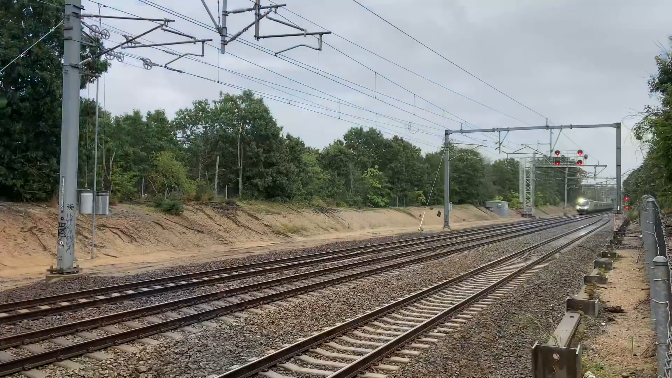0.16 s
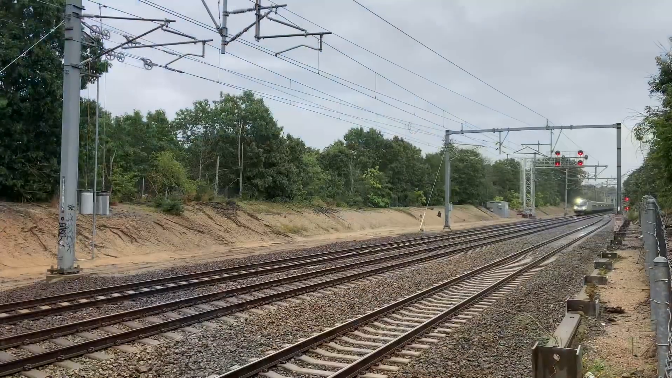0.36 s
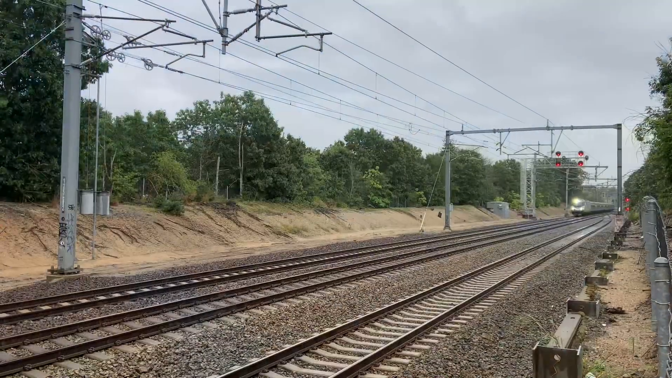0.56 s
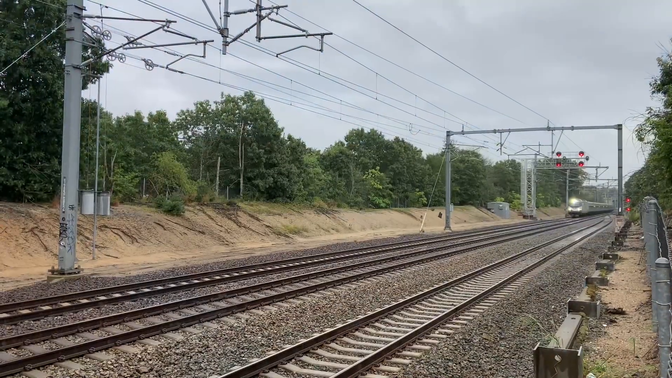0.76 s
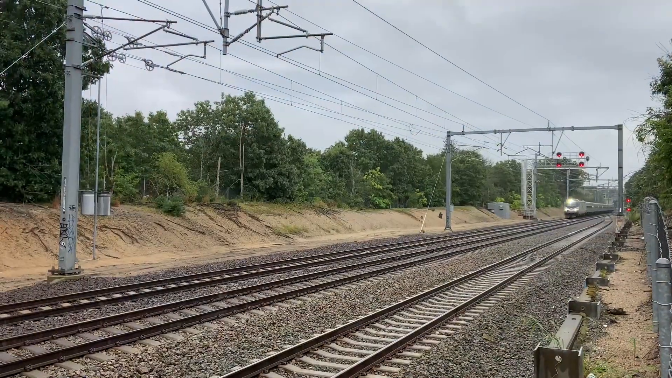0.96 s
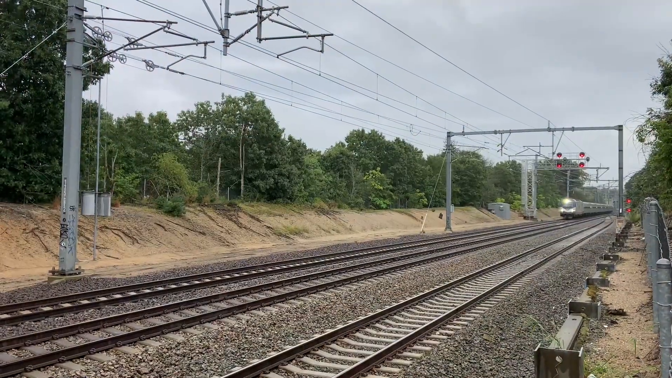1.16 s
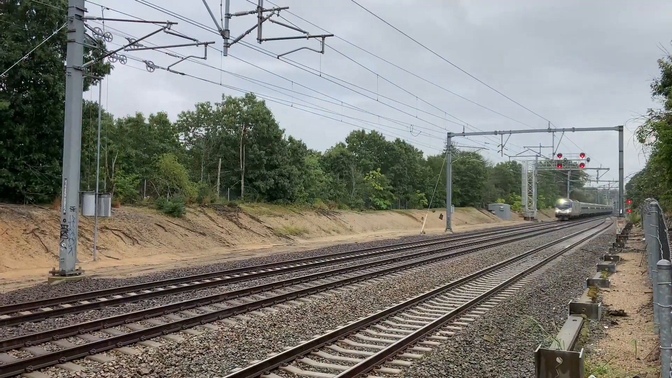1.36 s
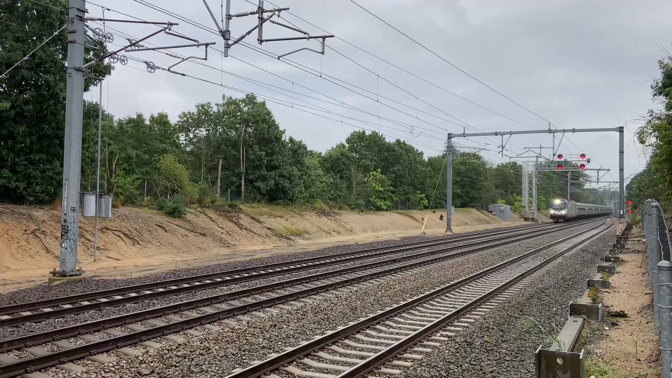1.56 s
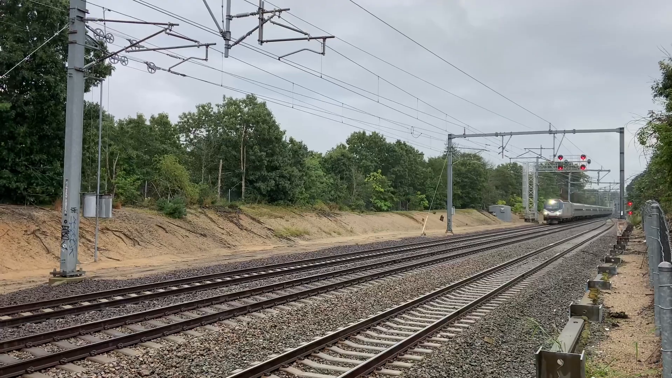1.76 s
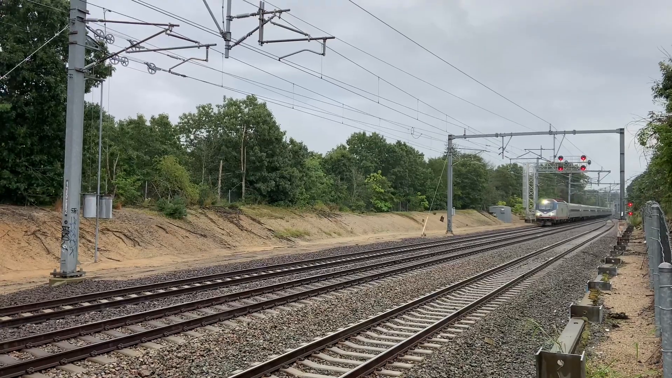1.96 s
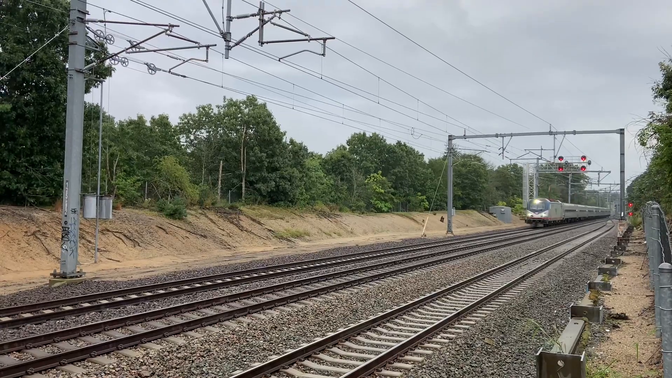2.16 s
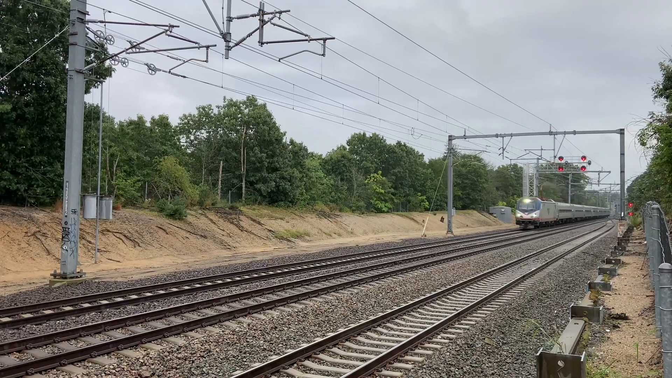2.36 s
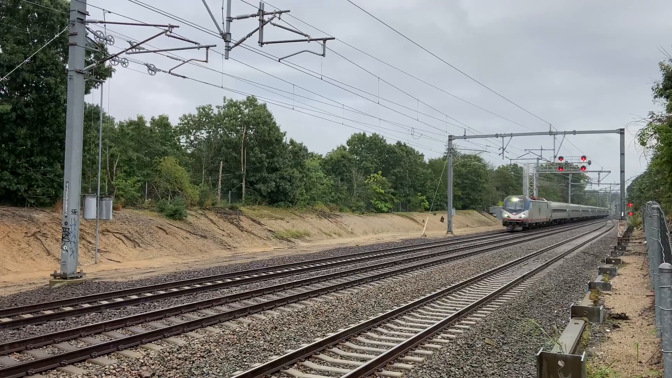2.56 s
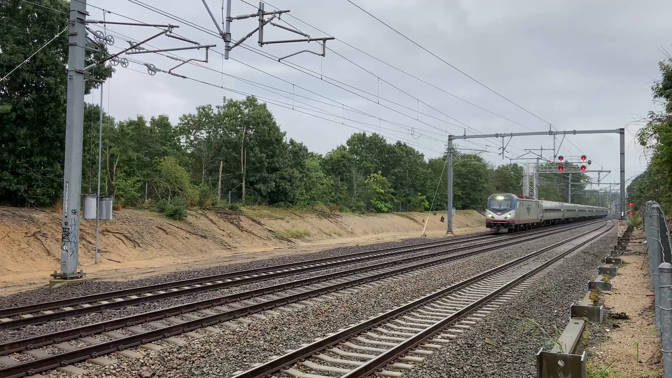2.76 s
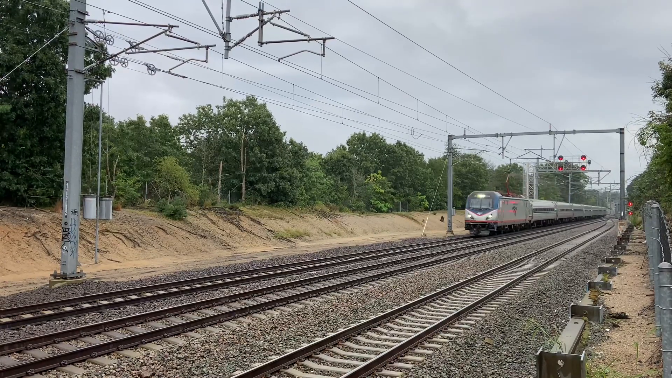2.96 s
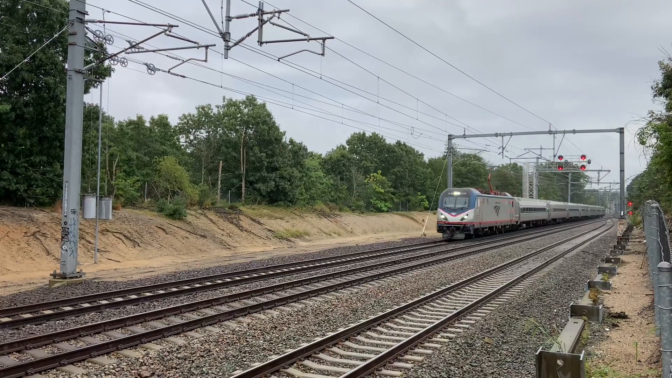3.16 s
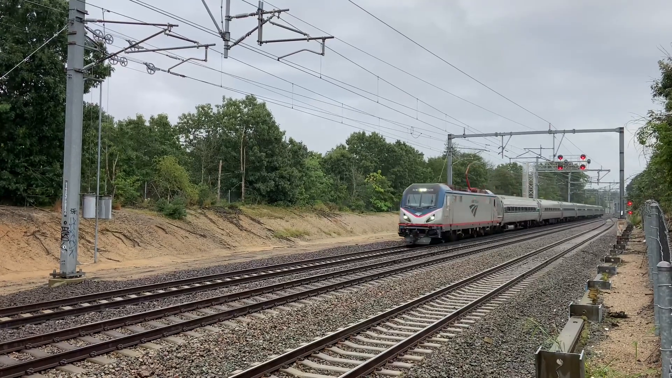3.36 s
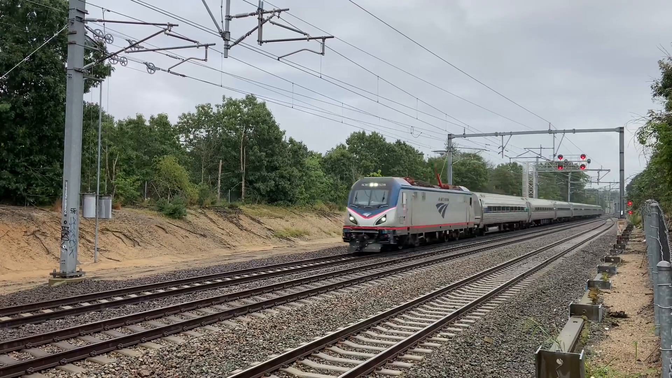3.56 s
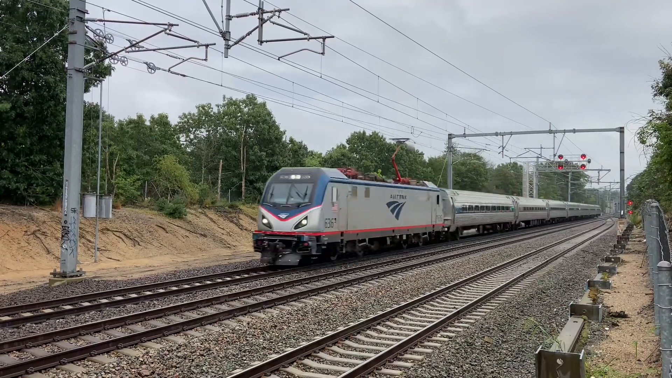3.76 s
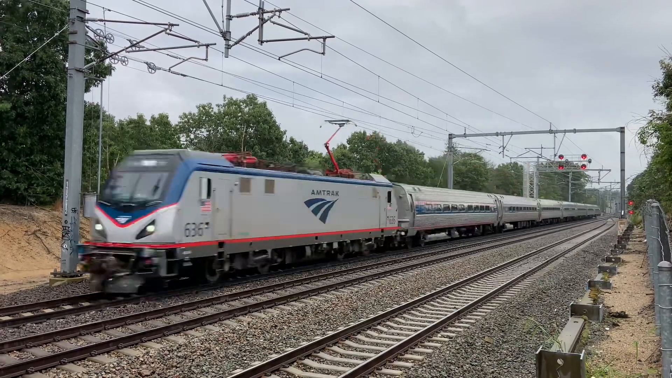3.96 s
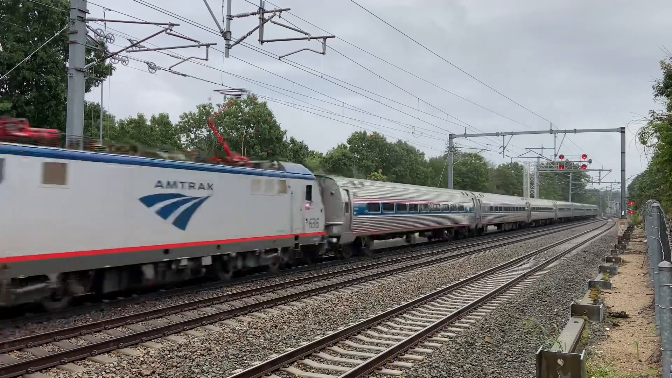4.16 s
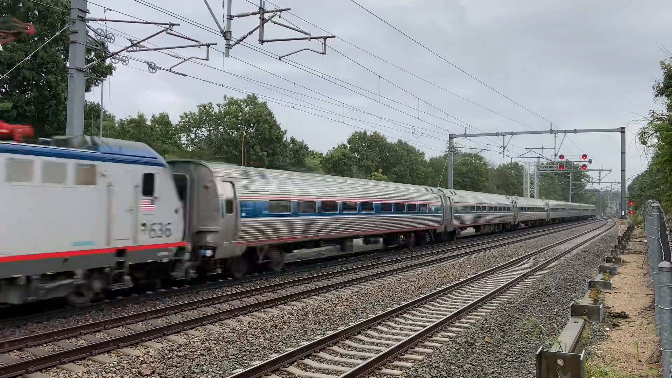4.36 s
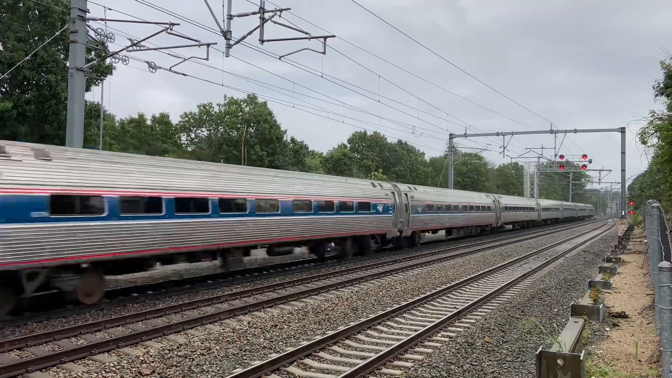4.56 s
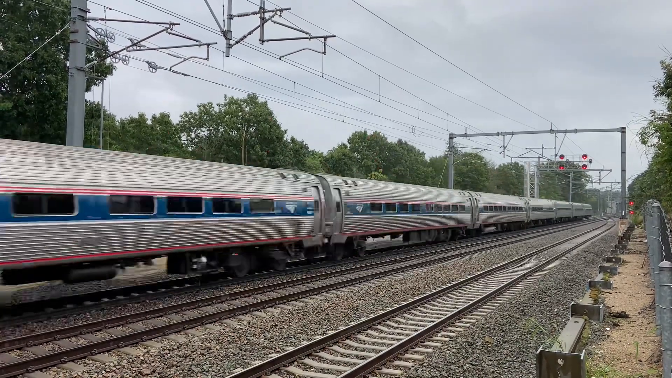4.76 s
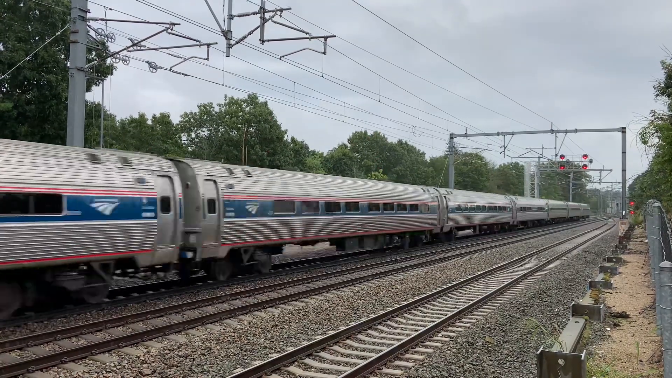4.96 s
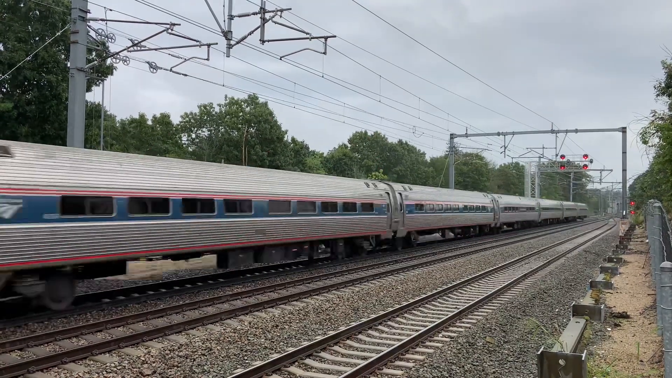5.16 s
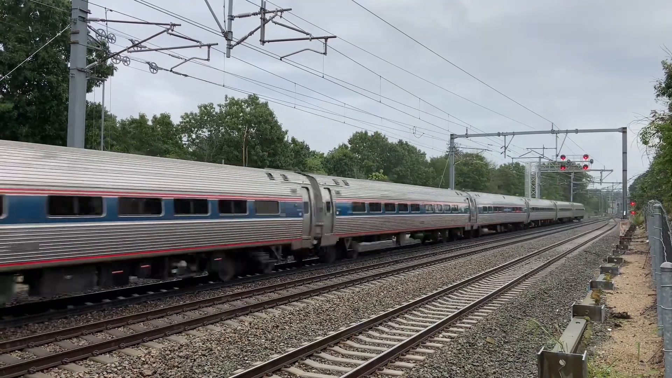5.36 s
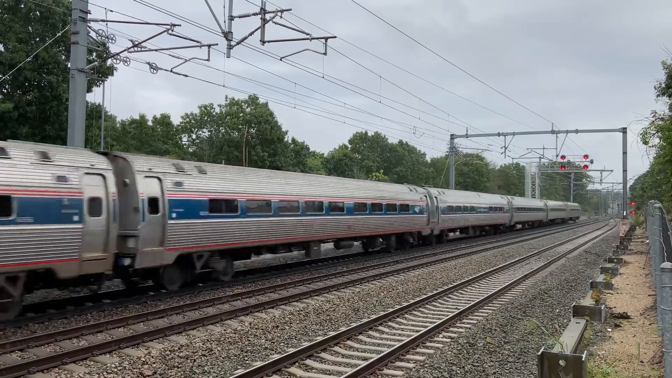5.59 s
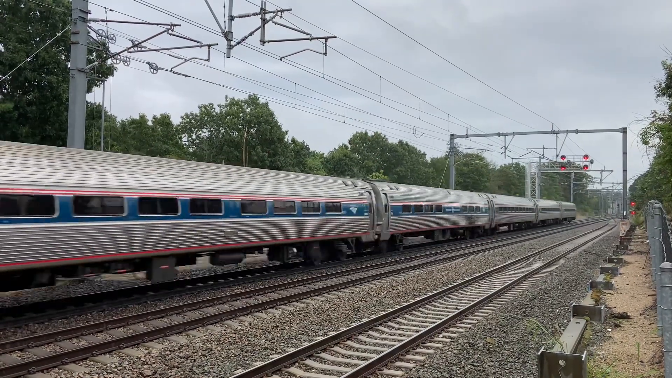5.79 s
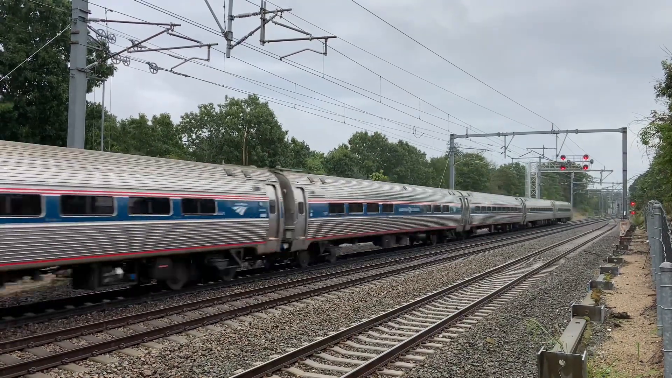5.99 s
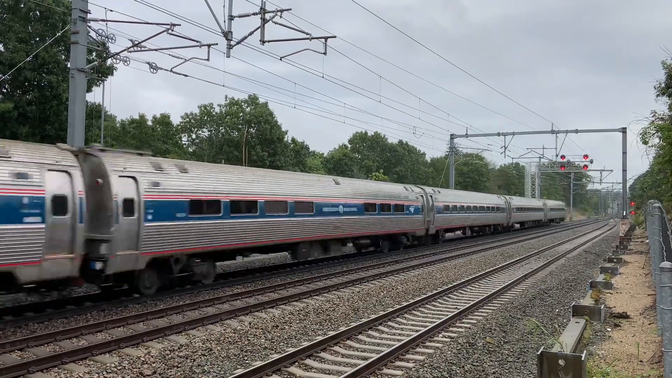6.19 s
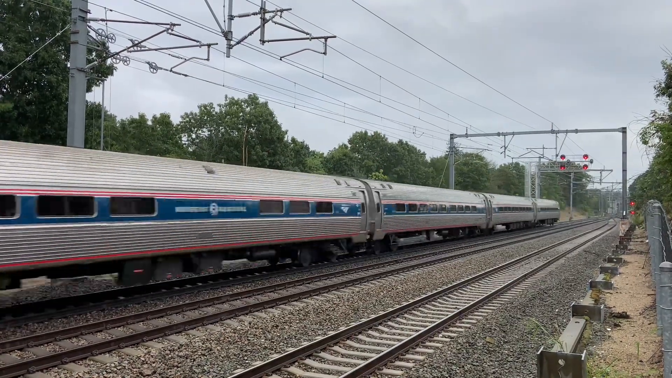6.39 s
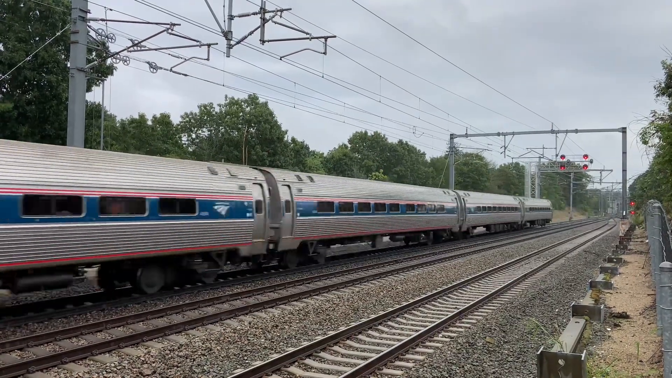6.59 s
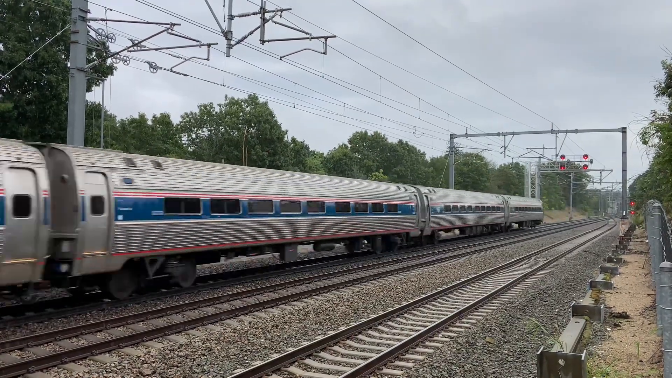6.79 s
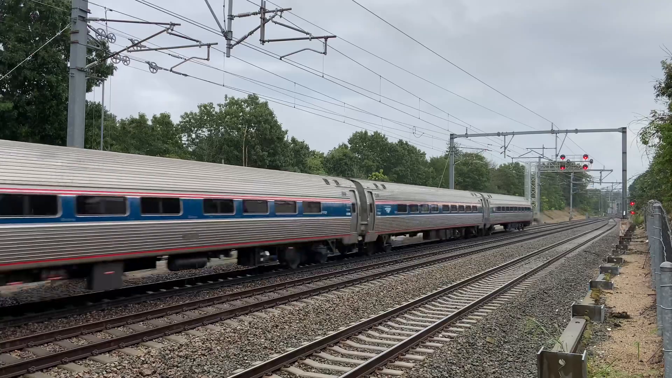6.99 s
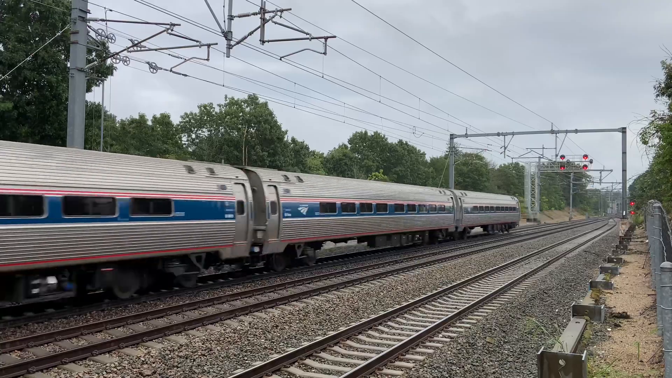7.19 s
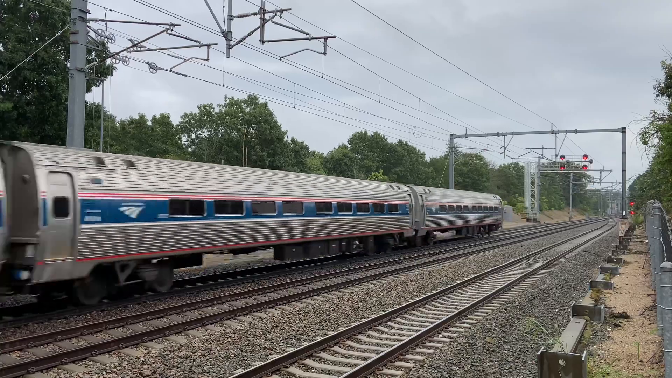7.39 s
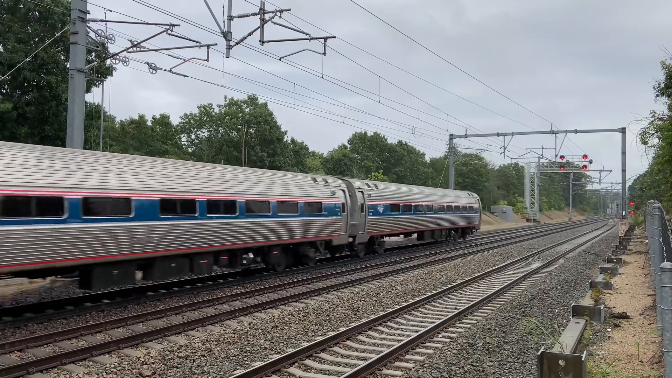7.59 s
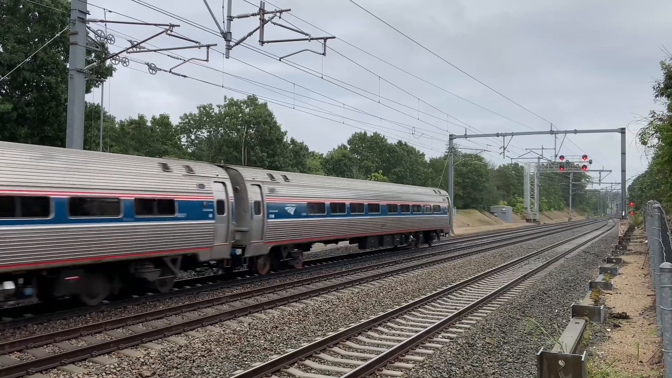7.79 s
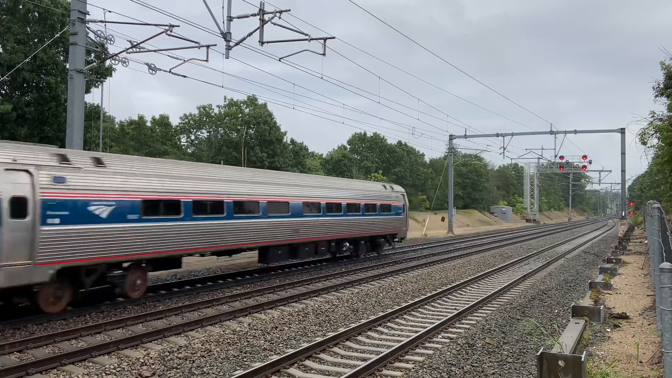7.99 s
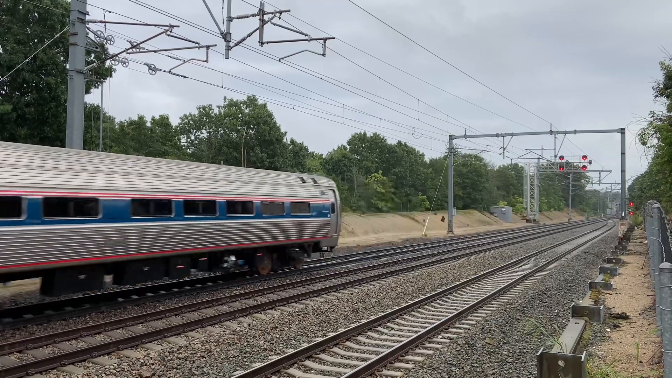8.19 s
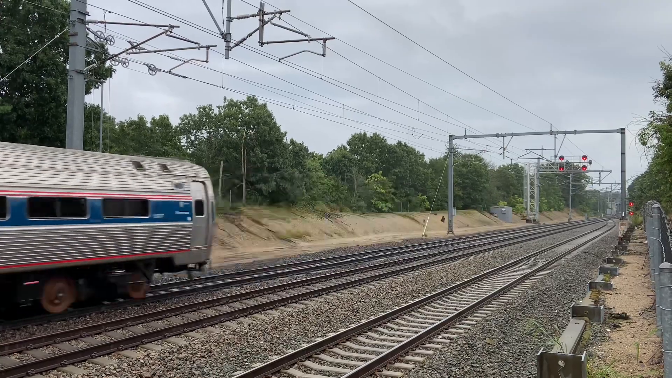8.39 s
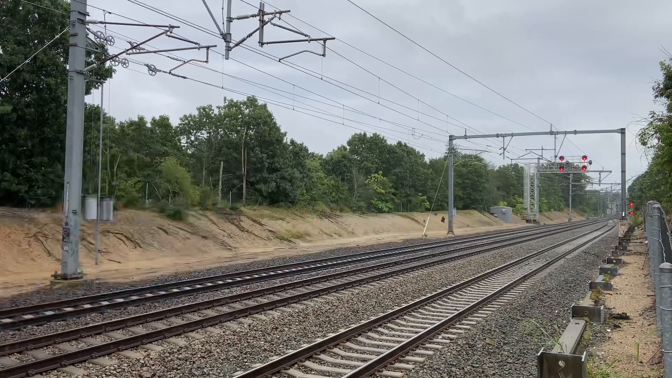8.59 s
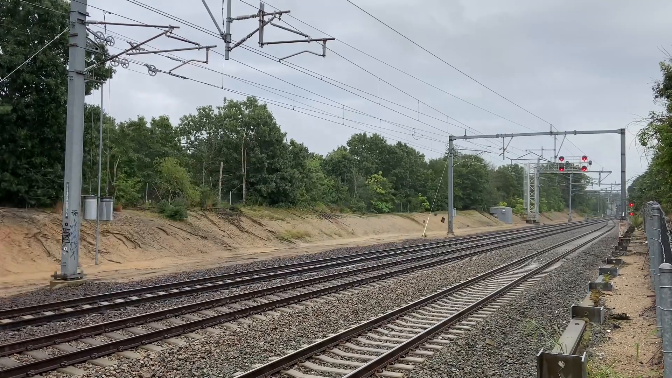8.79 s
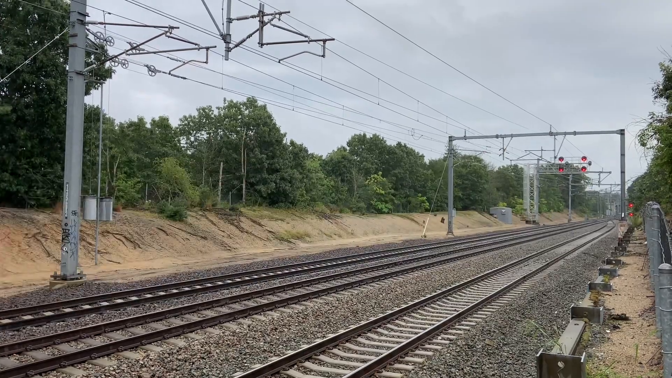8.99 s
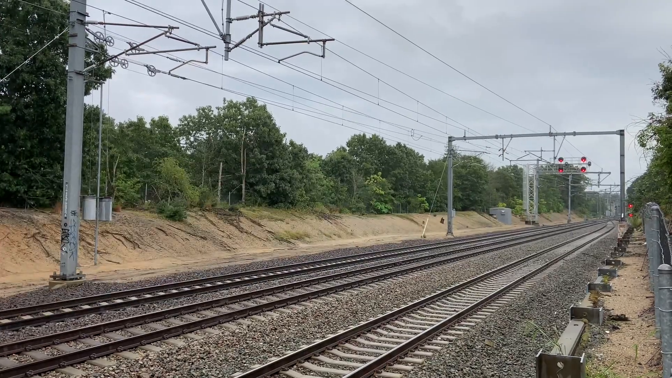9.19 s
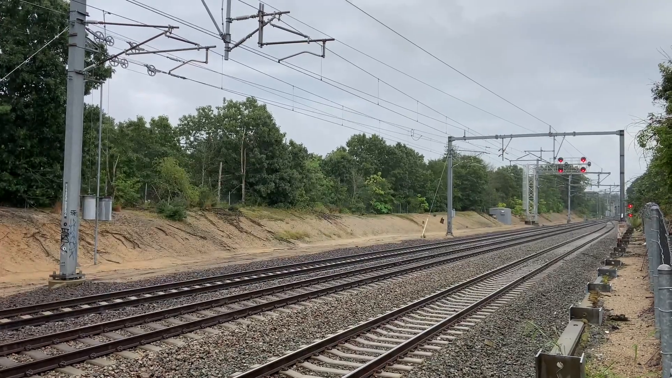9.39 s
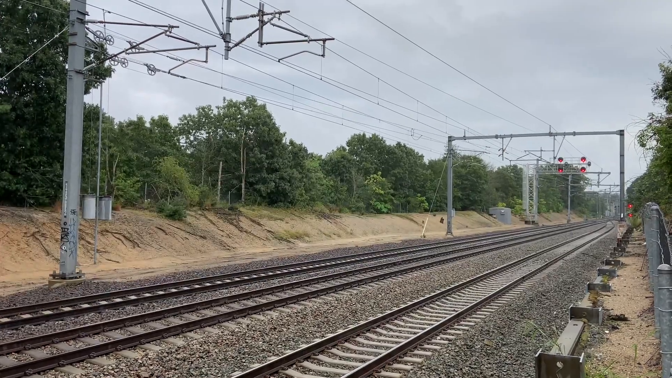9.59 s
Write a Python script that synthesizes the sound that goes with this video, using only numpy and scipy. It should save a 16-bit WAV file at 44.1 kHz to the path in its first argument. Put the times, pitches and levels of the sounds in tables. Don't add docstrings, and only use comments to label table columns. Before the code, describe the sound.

Outdoors beside a wooded railway, a faint hiss of leaves and thin ringing rails build into a rush. An electric locomotive shoots past right to left, its gear whine, motor hum and blowers dropping in pitch. Coaches follow with loud rolling noise, paired thuds, clacks and brief squeals, then fade quickly. A phone a dozen metres away hears it in stereo.

```python
import sys
import numpy as np
from scipy import signal
from scipy.fft import rfft, irfft, next_fast_len
from scipy.io import wavfile
from scipy.ndimage import uniform_filter1d, map_coordinates

SR = 44100
rng = np.random.default_rng(int(sys.argv[2]) if len(sys.argv) > 2 else 0)


def generate_wav(sig):
    pcm = np.round(np.clip(np.atleast_2d(sig).T, -1, 1) * 32767).astype(np.int16)
    wavfile.write(sys.argv[1], SR, pcm)


def to_linear_factor(level_db):
    exponent = np.asarray(level_db, float) / 20
    return 10 ** exponent


N = 425124
T = np.arange(N) / SR
SIZE = next_fast_len(N)
F = np.arange(SIZE // 2 + 1) * SR / SIZE
AGE = np.arange(-6000, 6000) / SR

SPEED, SOUND, TRACK_M = 45.5, 343, 12.5
AXLE_GAP_S = 0.0578
WIDEN_HZ = 6300

# t/s, level/dB
TRAIN = [(0, -45), (.8, -43.5), (1.7, -39.5), (3.0, -33.5), (3.5, -30), (3.94, -25.5), (4.25, -26),
         (4.6, -29), (4.85, -31), (5.35, -33.5), (5.85, -30), (6.4, -29), (7.1, -31.5), (8.5, -30),
         (8.64, -33), (8.85, -35.5), (9.1, -41.5), (9.64, -51.5)]
# low f/Hz, high f/Hz
ROAR_BANDS = [(30, 110), (150, 600), (1700, 5000), (7000, 15000)]
# f/Hz, density/dB per Hz
LOCO_COLOUR = [(25, -33), (65, 2), (120, -17), (250, -15), (900, -20), (1300, -13.5), (1900, -22.5),
               (2700, -24), (3400, -25.5), (4300, -27.5), (5500, -34.5), (8000, -33.5), (11000, -32.5),
               (15000, -43)]
COACH_COLOUR = [(25, -14), (45, -7), (70, 1), (120, -7), (220, -4.5), (400, -6), (950, -5), (1400, -2.5),
                (2200, -7.5), (3000, -10.5), (3600, -15), (4700, -22.5), (5800, -23), (8000, -28.5),
                (15000, -32.5)]
# level at reference/dB, slope/dB per dB
LOCO_BANDS = [(-18.5, 0.94), (-22, 1.5), (-29.5, 1.06), (-34.5, 1.5)]
COACH_BANDS = [(-32.5, 0.29), (-30.5, 0.85), (-29.5, 1.04), (-35.5, 0.82)]
BOGIE_SWELL_DB = [0.3, 6.3, 2.4, 0.94]
BAND_LEAD_S = [0.15, 0.016, 0.014, 0.24]
# f/Hz, width/Hz, level/dB
GROUND_DIPS = [(190, 56, -0.5), (284, 36, -2.5), (910, 68, -2), (1605, 72, -5.5)]

# abeam t/s, f/Hz, width/Hz, level/dB
WHINE = [
    (4.41, 1305, 21.6, -2.5),
    (4.62, 1300, 60, -7),
    (4.5, 1245, 134, -5.5),
    (4.55, 1460, 53, -12),
    (4.45, 1600, 76, -12),
    (4.7, 1720, 290, -14),
    (4.9, 1030, 150, -16),
]
# abeam t/s, f/Hz, width/Hz, level/dB
HUM = [
    (4.55, 338, 14.2, 0.5),
    (4.5, 142, 35, -5.5),
]
# t/s, lift/dB
HUM_BEATS = [(1.9, 13), (2.6, 15), (3.3, 11), (3.49, 15), (3.729, 15), (3.88, -1), (3.98, -14.5), (4.12, 7),
             (4.2, 0.5), (4.39, 8.5), (4.6, -1), (4.72, 7)]
# t/s, level/dB
MOTOR = [(0, -63), (.6, -60), (1.8, -42.5), (2.8, -37.5), (3.1, -27), (3.38, -34.5), (3.6, -22),
         (3.9, -16.5), (4.36, -15), (4.45, -19.5), (4.65, -19), (4.88, -23.5), (5.05, -24.5), (5.3, -34),
         (5.5, -31)]
# abeam t/s, f/Hz, width/Hz, level/dB
BLOWERS = [
    (4.5, 2617, 330, -3),
    (4.55, 2398, 245, -2),
    (4.551, 3860, 500, -11.5),
]
# t/s, level/dB
BLOWER = [(0, -63), (1.8, -45), (3.0, -42.5), (3.95, -30.5), (4.05, -29), (4.17, -39), (4.35, -28.5),
          (4.5, -31.5), (4.62, -26.5), (4.75, -35), (5.0, -34), (5.15, -59)]

# width/Hz, level ahead/dB, level behind/dB
SONG_LOW = [(90, -6, -10), (160, -22, -16), (120, -19, -13), (120, -17, -24), (90, -30, -27),
            (90, -26, -27), (80, -33, -32), (80, -36, -37)]
# width/Hz, level ahead/dB, level behind/dB
SONG_HIGH = [(90, -25, -9), (90, -25, -12), (90, -25, -6), (90, -22, -10), (70, -5, -10), (70, -5, -6),
             (110, -7, -7), (90, -12, -12), (110, -9, -4), (150, -13, -9), (150, -12, -10), (100, -20, -12)]
# level at reference/dB, slope/dB per dB
SONG_FOLLOWS = [(-30, 1.16), (-28.5, 0.5)]
# t/s, level/dB
HIGH_SONG = [(0, -57), (1.5, -51), (1.7, -46), (3.2, -43), (3.8, -48), (4.4, -60), (8.3, -59), (8.9, -52),
             (9.64, -54)]
# f/Hz, width/Hz, level/dB, share of the receding sag
RAIL_MODES = [(717, 67, -5.5, 1), (786, 74, -7, 1), (1370, 41, -8, 1), (1423, 59, -8, -0.4),
              (1510, 74, -17, 3.5), (2170, 37, -18, 2), (2690, 45, -24, 0.3), (2880, 55, -19.5, 0.2),
              (3050, 57, -23, -1), (3335, 58, -28, -2), (3990, 64, -27, -0.5), (5850, 130, -21, -1),
              (5450, 77, -22, 0)]
# t/s, level/dB
MODE_LOAD = [(5.6, -3.5), (6.1, -1), (6.45, -2.5), (6.7, 1.5), (6.95, -0.5), (7.2, 3.5), (7.55, -1.5),
             (7.8, -1.5), (8.15, -0.5), (8.45, 2.5), (8.66, -4), (8.95, 2), (9.07, -9), (9.14, -2),
             (9.25, 0.5), (9.45, -1), (9.64, -1)]

# first axle t/s, thud level/dB, clack level/dB
BOGIES = [(4.12, -62, -65), (4.36, -36, -36), (4.60, -31, -46), (5.002, -34, -30), (5.161, -30, -50),
          (5.561, -32, -57), (5.73, -33.5, -42), (6.131, -31, -42), (6.31, -28, -26), (6.48, -74, -30),
          (6.67, -51, -23.5), (6.72, -32, -49), (6.89, -34.5, -32), (7.07, -50, -24.5), (7.25, -58, -35),
          (7.31, -32.5, -27), (7.469, -31, -29), (7.655, -65, -35), (7.898, -34, -26.5),
          (8.04, -31.5, -27.5), (8.29, -59, -36.5), (8.44, -34, -48), (8.465, -60, -30), (8.811, -45, -25)]
# t/s, peak level/dB, f/Hz
KNOCKS = [(4.345, -11, 364), (4.769, -16, 312), (5.201, -23, 214), (5.723, -15, 240.7), (5.782, -17, 218),
          (6.125, -14, 380), (6.302, -12.5, 406), (6.359, -11, 229), (6.709, -16, 231), (6.882, -16, 232),
          (6.937, -16, 215), (7.289, -18, 215), (7.462, -13, 245), (7.515, -15, 226), (7.58, -16, 160),
          (8.092, -13, 218), (8.493, -20, 211)]
# t/s, f/Hz, level/dB, length/s
STRUCK = [(5.25, 1190, -37, 0.074), (5.62, 2920, -41, 0.027), (5.64, 1174, -38, 0.035),
          (5.75, 1160, -35, 0.033), (5.81, 3680, -41, 0.023), (5.9, 1170, -36, 0.05),
          (5.92, 1554, -36, 0.056), (5.95, 2230, -40, 0.025), (6.1, 3280, -46, 0.023),
          (6.15, 2280, -42, 0.035), (6.33, 3010, -36, 0.029), (6.46, 3080, -33, 0.023),
          (6.47, 1430, -36, 0.033), (6.49, 2880, -38, 0.041), (6.51, 2250, -31.5, 0.017),
          (6.61, 2720, -32, 0.012), (6.67, 2170, -44, 0.031), (6.72, 2700, -42, 0.084),
          (6.78, 2024, -35.5, 0.026), (6.85, 2970, -38, 0.022), (6.92, 1510, -30.5, 0.03),
          (6.93, 2270, -38, 0.018), (6.97, 2050, -38, 0.025), (7.05, 1420, -26, 0.033),
          (7.06, 2840, -37, 0.019), (7.07, 1514, -33, 0.046), (7.14, 1880, -34, 0.015),
          (7.14, 2290, -42, 0.031), (7.21, 1370, -38, 0.052), (7.22, 3660, -50, 0.027),
          (7.31, 1790, -44, 0.04), (7.66, 2530, -42, 0.021), (7.74, 3620, -44, 0.025),
          (7.78, 3600, -43, 0.064), (7.81, 3280, -46, 0.031), (7.85, 4310, -46, 0.025),
          (7.88, 1850, -39, 0.042), (8.04, 3050, -39, 0.027), (8.11, 2065, -42, 0.028),
          (8.31, 1310, -42, 0.052), (8.31, 2100, -36.5, 0.023), (8.33, 1370, -43, 0.056),
          (8.36, 2700, -42, 0.027), (8.47, 1890, -36, 0.023), (8.48, 2300, -42, 0.038),
          (8.81, 1840, -37, 0.016), (8.82, 1330, -43, 0.046), (8.82, 2150, -46, 0.058),
          (8.82, 3560, -47, 0.027), (8.88, 1860, -37, 0.019)]
# t/s, f/Hz, level/dB, length/s
MORE_STRUCK = [(2.9, 160, -41, .05), (1.7, 158, -39, .05), (1.35, 390, -46, 0.045), (1.4, 310, -48, 0.055),
               (1.9, 385, -47, .05), (4.3, 1600, -29, .03), (4.6, 1200, -28, 0.027), (5, 1600, -33, .04),
               (7.06, 550, -32.5, 0.02), (8, 715, -31, 0.035), (8.47, 730, -32, .03), (8.78, 540, -44, 0.037),
               (8.87, 700, -35, .04), (6.93, 138, -38.5, .04), (8.74, 120, -43.5, .04), (4.9, 190, -41.5, .04),
               (4.14, 650, -30, .05), (6.1, 1200, -27, .04), (3.2, 1270, -30, .04), (9.2, 780, -44.5, 0.047),
               (9.13, 2170, -51, 0.031), (9.4, 1200, -47, 0.069)]
# abeam t/s, f/Hz at the source, level/dB, length/s
SQUEALS = [(5.16, 6070, -48, .06), (5.36, 5740, -53, .08), (6.3, 6000, -50, .05), (8.17, 6100, -49, .05),
           (7.82, 10700, -53, .06), (5.92, 10800, -54, .07), (6.3, 11300, -55, .06), (5.7, 3750, -48, .1),
           (5.8, 4850, -52, .05), (6.83, 4150, -50, .06), (6.95, 5400, -52, .08), (5.85, 5550, -49, .06),
           (6.62, 5800, -50, .07), (6.9, 5900, -51, .06), (7.07, 6050, -47, .08), (7.27, 5650, -49, .12),
           (7.57, 5800, -48, .07), (7.5, 4850, -51, .04), (8.15, 5800, -49, .07), (8.35, 5800, -53, .05),
           (7.67, 1900, -39, .025), (6.5, 2250, -41, .05)]
# lowest f/Hz, highest f/Hz, level/dB, length/s
RINGS = [
    (1600, 3100, -44, .022),
    (3300, 4600, -52, .04),
    (5200, 6400, -50, .05),
    (9500, 12000, -54, .06),
    (14300, 15600, -57, .05),
]

# f/Hz, width/Hz,
# level/dB
FAR_MODES = [(159.4, 33, -59.5), (388, 20, -60.5), (1508, 30, -59), (1126, 130, -52.5), (1458, 77, -51),
             (2100, 150, -55), (2480, 120, -57), (2920, 150, -57), (3600, 130, -71), (3950, 120, -62),
             (4280, 160, -60), (4740, 100, -62.5)]
# f/Hz, density/dB per Hz
WOODS = [(100, -14), (500, 9.5), (1200, 1), (3000, -10), (4500, -9), (6000, 1.5), (9000, -58)]

# t/s, lag/samples
LEFT_LAG = [
    (0, 3.2),
    (2.6, 2.4),
    (3.85, -2.),
    (4.14, -6.),
    (4.33, -15.5),
    (9.1, -16.),
    (9.64, -14.),
]
# up to f/Hz, lag factor
LAG_STRETCH = [(1500, .95), (2400, 1.12), (22050, 1.27)]
# f/Hz, left minus right level/dB
BALANCE_DB = [(100, -.6), (380, .1), (700, 3.), (1290, 1.4), (2400, -.6), (4400, -2.2), (6500, -2.5)]
# f/Hz, level/dB
SCATTER_DB = [(60, -29.), (250, -21.), (700, -10.), (1300, -5.5), (3000, -3.5), (6000, -3.)]
# f/Hz, level/dB
DULL = [(6500, 3), (9500, -3.5), (11000, -10.5), (15000, -6)]


def level(x, db):
    return x * to_linear_factor(db) / np.sqrt(np.mean(x ** 2))


def fader(table):
    return np.interp(T, *np.transpose(table))


def bump(t, centre_s, length_s):
    return np.exp(-.5 * ((t - centre_s) / length_s) ** 2)


def on_log(table, hz):
    f, db = np.transpose(table)
    return np.interp(np.log(hz + 1), np.log(f), db)


def shaped(x, gain):
    return irfft(rfft(x, SIZE) * gain, SIZE)[..., :N]


def noise():
    return rng.standard_normal(N)


def walk(rate):
    k = int(SR / rate)
    held = np.repeat(rng.standard_normal(N // 200 + 1), k)[:N]
    return 1.7 * uniform_filter1d(uniform_filter1d(held, k), k)


def rough_tone(hz, width_hz, steady=.0):
    step = 32
    skirts = signal.butter(3, .6 * width_hz, fs=SR / step, output="sos")
    slow = signal.sosfilt(skirts, rng.standard_normal((2, N // step + 402)))[:, 400:]
    a, b = (np.interp(T, np.arange(len(s)) * step / SR, s / s.std()) for s in slow)
    phase = 2 * np.pi * np.cumsum(hz) / SR
    tone = (a + steady) * np.cos(phase) + b * np.sin(phase)
    return tone / np.sqrt(2 + steady ** 2 / 2) * np.sqrt(2)


def doppler(since_abeam_s):
    x = SPEED * since_abeam_s
    return 1 / (1 + SPEED / SOUND * x / np.hypot(x, TRACK_M))


def late(x, samples):
    return map_coordinates(x, [np.arange(N) - samples], order=3)


def follow(rows, train_db, behind):
    ahead_db, behind_db = (db + slope * (train_db + 30) for db, slope in rows)
    return ahead_db + (behind_db - ahead_db) * behind


def roar_levels():
    cleared = np.interp(T, [3.51, 5.13], [0, 1])
    thuds, clacks = np.zeros(N), np.zeros(N)
    for s, thud_db, clack_db in BOGIES:
        passing = bump(T, s + AXLE_GAP_S / 2, .038)
        thuds += passing * to_linear_factor(thud_db + 30.5) ** .5
        clacks += passing * to_linear_factor(clack_db + 30.5) ** .5
    bands = []
    for k, passing in enumerate((thuds, thuds, clacks, clacks)):
        train_db = np.interp(T + BAND_LEAD_S[k], *np.transpose(TRAIN))
        rolling_db = follow((LOCO_BANDS[k], COACH_BANDS[k]), train_db, cleared)
        bands.append(rolling_db + BOGIE_SWELL_DB[k] * (passing - .5 * cleared))
    return np.array(bands)


def roar(behind):
    centres = np.log([np.sqrt(lo * hi) for lo, hi in ROAR_BANDS])
    colours = (LOCO_COLOUR, COACH_COLOUR)
    unit = []
    for colour in colours:
        c = on_log(colour, F)
        unit.append([-10 * np.log10(np.sum(to_linear_factor(2 * c[(F > lo) & (F < hi)]))) for lo, hi in ROAR_BANDS])
    band_db = roar_levels()
    out, swell = np.zeros(N), walk(7.3)
    for hz in 20 * 2 ** np.arange(0, 9.7, .25):
        window = np.cos(np.pi / 2 * np.clip(np.log2((F + 1) / hz) / .25, -1, 1))
        spectrum = window * np.exp(2j * np.pi * rng.random(len(F)))
        band = irfft(spectrum, SIZE)[:N] * SIZE / np.sqrt(2)
        ahead_db, behind_db = (on_log(c, hz) + np.interp(np.log(hz), centres, u)
                               for c, u in zip(colours, unit))
        shares = np.array([np.interp(np.log(hz), centres, one) for one in np.eye(4)])
        db = shares @ band_db + (1 - behind) * ahead_db + behind * behind_db
        flicker_db = .8 + .7 * behind * (600 < hz < 3000) + .4 * (3000 < hz < 7000) + .9 * (hz > 11000)
        out += band * to_linear_factor(db - 2.5 + .5 * swell + flicker_db * walk(12))
    return out


def over_ballast(rolling):
    dips = to_linear_factor(sum(db * np.exp(-.5 * ((F - hz) / width) ** 2) for hz, width, db in GROUND_DIPS))
    far = np.interp(T, [3.1, 4.1], [1, 0])
    return far * shaped(rolling, dips) + (1 - far) * rolling


def motor_lines(table, firm_hz):
    shadow_db = 5 * np.interp(T, [4.2, 4.4], [0, 1])
    out = np.zeros(N)
    for s, hz, width, db in table:
        gain = to_linear_factor(db - shadow_db * (width < 30))
        out += gain * rough_tone(hz * doppler(T - s), width, steady=firm_hz / width)
    return out


def motors():
    beats_db = sum(db * bump(T, s, .035) for s, db in HUM_BEATS)
    hum_db = -12.5 - 6 * np.clip(T - 4.43, 0, 1) + beats_db
    screen_db = -40 * np.clip(T - 5.4, 0, 1)
    tones = motor_lines(WHINE, 36) + motor_lines(HUM, 16) * to_linear_factor(hum_db)
    return tones * to_linear_factor(fader(MOTOR) + screen_db)


def blowers():
    fans = sum(to_linear_factor(db + 2.0 * walk(25.07)) * rough_tone(hz * doppler(T - s), width)
               for s, hz, width, db in BLOWERS)
    fade_db = -60 * np.maximum(T - BLOWER[-1][0], 0)
    return fans * to_linear_factor(fader(BLOWER) + fade_db)


def track_modes(low_db):
    sag = np.interp(T, [8.75, 9.0], [0, .068])
    modes = np.zeros(N)
    for hz, width, db, share in RAIL_MODES:
        flutter = to_linear_factor(db + 1.88 * walk(18))
        modes += flutter * rough_tone(hz * (1 - sag * share), width, steady=.3)
    modes *= np.interp(T, [3.5, 5.4], [0, 1]) * to_linear_factor(low_db + fader(MODE_LOAD))
    tail = np.interp(T, [8.1, 8.5], [0, 1]) if TAIL_RISES else np.interp(T, [8.5, 8.1], [0, 1])
    return modes + tail * to_linear_factor(-56) * rough_tone(np.full(N, 5900), 70)


TAIL_RISES = False


def rail_song(behind, low_db, high_db):
    hz = 759 + (729 - 759) * behind
    out = level(shaped(noise(), F > 9200), high_db) * (1 - behind)
    for first, table, db in ((1, SONG_LOW, low_db), (10, SONG_HIGH, high_db)):
        for k, (width, ahead_db, behind_db) in enumerate(table):
            line_db = ahead_db + (behind_db - ahead_db) * behind
            out += rough_tone((first + k) * hz, width) * to_linear_factor(db + line_db)
    return out


def joint():
    thud_gate, clack_gate = np.zeros(N), np.zeros(N)
    for s, thud_db, clack_db in BOGIES:
        for axle_s in (s, s + AXLE_GAP_S):
            age = np.clip(T - axle_s + 0.013, 0, 1)
            thud_gate += to_linear_factor(thud_db) * age / 0.0076 * np.exp(1 - age / 0.0088)
            clack_gate += to_linear_factor(clack_db) * age / .009 * np.exp(1 - age / .009)
    thud = shaped(noise(), 1 / (1 + (140 / (F + 1)) ** 4) / (1 + (F / 380) ** 2))
    clack = shaped(noise(), 1 / (1 + (500 / (F + 1)) ** 4) / (1 + (F / 2500) ** 6))
    return level(thud, 0) * thud_gate + level(clack, 0) * clack_gate


def struck():
    out = np.zeros(N)
    events = STRUCK + MORE_STRUCK
    for (s, hz, db, length), turn in zip(events, rng.random(len(events))):
        start = int(s * SR) - len(AGE) // 2
        gate = to_linear_factor(db + 6.5) * bump(AGE, 0, length)
        out[start:start + len(AGE)] += gate * np.sin(2 * np.pi * (hz * AGE + turn))
    after = np.maximum(AGE, 0)
    for s, db, hz in KNOCKS:
        start = int(s * SR) - len(AGE) // 2
        gate = (1 - np.exp(-after / 0.0037)) * to_linear_factor(db - 4 - 60 * after / 0.075)
        out[start:start + len(AGE)] += gate * np.sin(2 * np.pi * hz * after)
    return out


def squeals():
    out = np.zeros(N)
    for s, hz, db, length in SQUEALS:
        pitch = hz * doppler(T - s) ** .7
        octave = to_linear_factor(-9) * np.sin(4 * np.pi * np.cumsum(pitch) / SR)
        out += 2.0 * to_linear_factor(db) * bump(T, s, length) * (rough_tone(pitch, 70, steady=.6) + octave)
    return out


def rings():
    out = np.zeros(N)
    bend = np.cumsum(doppler(AGE)) / SR
    first_s, last_s = 4.6, 8.45
    for low_hz, high_hz, db, length in RINGS:
        for when, place, size, turn in rng.random((45, 4)):
            start = int((first_s + when * (last_s - first_s)) * SR)
            hz = low_hz * (high_hz / low_hz) ** place
            gate = to_linear_factor(db + 2 * (4 * size - 2)) * bump(AGE, 0, length)
            out[start:start + len(AGE)] += gate * np.sin(2 * np.pi * (hz * bend + turn))
    return out


def far_rail(train_db):
    gain = np.zeros(len(F))
    for hz, width, db in FAR_MODES:
        gain += to_linear_factor(db) * np.sqrt(SR / 2 / width) / (1 + ((F - hz) / (0.66 * width)) ** 4)
    drowned = np.interp(T, [2.16, 3.9], [1, 0])
    return shaped(noise(), gain) * to_linear_factor(train_db - TRAIN[0][1]) * drowned


def woods():
    return level(shaped(noise(), to_linear_factor(on_log(WOODS, F))), -50.5 + walk(3))


def two_ports(train, knocks):
    share = to_linear_factor(on_log(SCATTER_DB, F)) * (F < WIDEN_HZ)
    stray = shaped(train, share)
    echoes = [late(stray, SR * (delay_s + .0004 * walk(4))) for delay_s in (.017, .029)]
    direct = shaped(train, np.sqrt(np.clip(1 - share ** 2, 0, 1))) + knocks
    lag = fader(LEFT_LAG)
    edges = np.transpose(LAG_STRETCH)[0]
    left = np.zeros(N)
    for k, (_, stretch) in enumerate(LAG_STRETCH):
        band = shaped(direct, np.searchsorted(edges, F) == k)
        left += late(band, lag + np.minimum(lag, 0) * (stretch - 1))
    ports = np.array([left, direct]) + echoes
    tilt = on_log(BALANCE_DB, F) / 2
    top = shaped(direct, F >= WIDEN_HZ)
    return shaped(ports, (F < WIDEN_HZ) * to_linear_factor(np.array([tilt, -tilt]))) + top


def scene():
    train_db = fader(TRAIN)
    behind = np.interp(T, [4.4, 5.2], [0, 1])
    low_db = follow(SONG_FOLLOWS, train_db, behind)
    train = over_ballast(roar(behind)) + motors() + blowers()
    train += track_modes(low_db) + rail_song(behind, low_db, fader(HIGH_SONG))
    train += squeals() + rings() + far_rail(train_db) + woods()
    return two_ports(train, joint() + struck())


def top_cut(x):
    return signal.sosfilt(signal.butter(12, 17070, fs=SR, output="sos"), x)


def record(dry):
    treble = shaped(dry, F >= WIDEN_HZ)
    held = np.clip((1.61 - T) / 0.012, 0, 1)
    one = held * shaped(treble[1], to_linear_factor(on_log(DULL, F))) + (1 - held) * treble[1]
    left = -np.roll(one, 10) + to_linear_factor(-6) * np.roll(one, 700)
    wide = np.tanh(dry - treble + np.array([left, one]))
    mix = shaped(wide, F < 15750)
    return top_cut(mix)


dry = scene()
out = record(dry)
generate_wav(out)
```